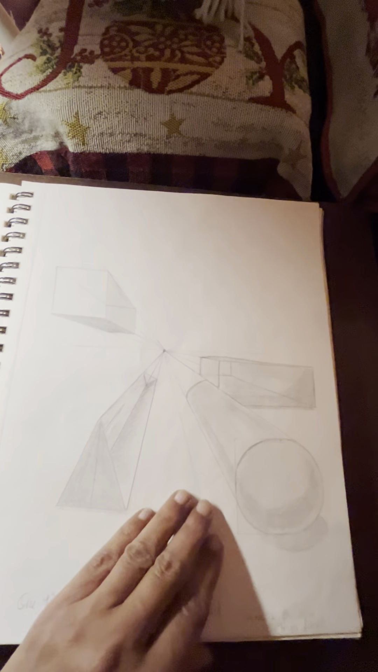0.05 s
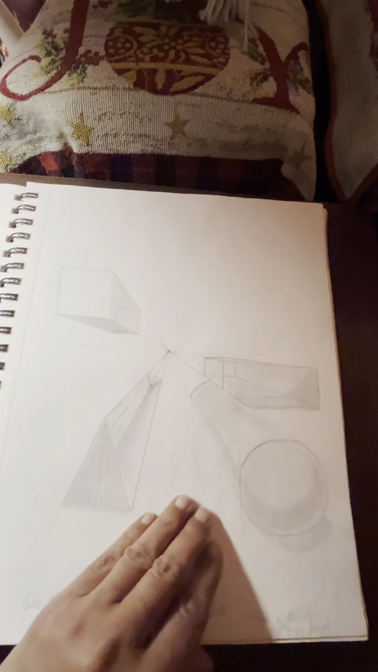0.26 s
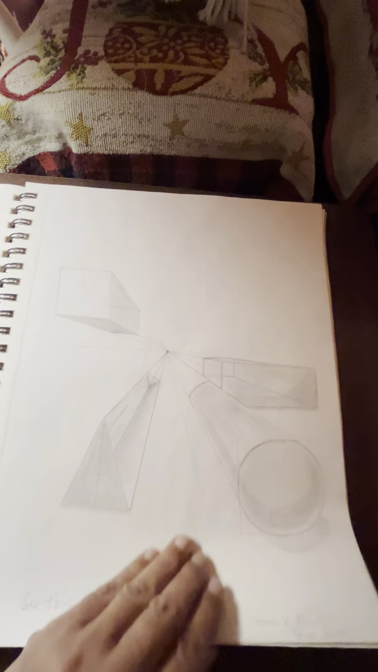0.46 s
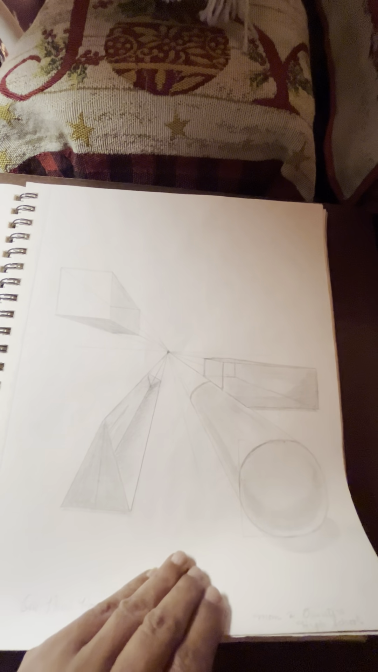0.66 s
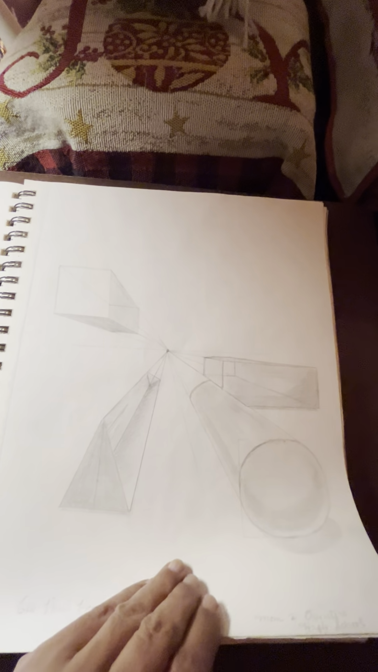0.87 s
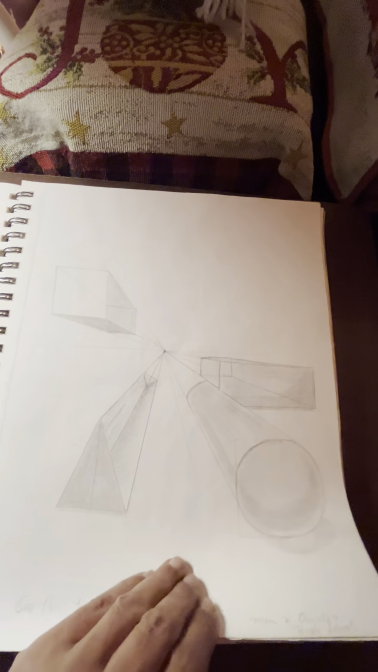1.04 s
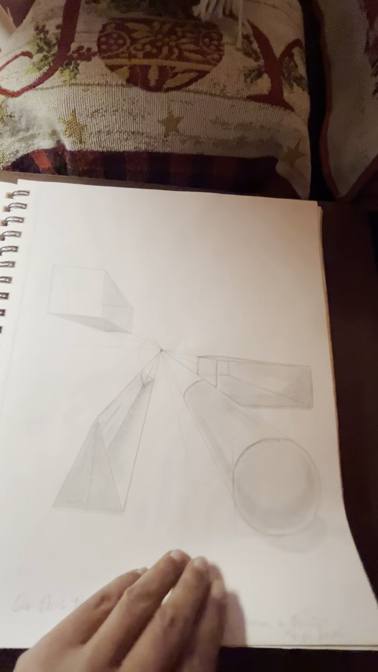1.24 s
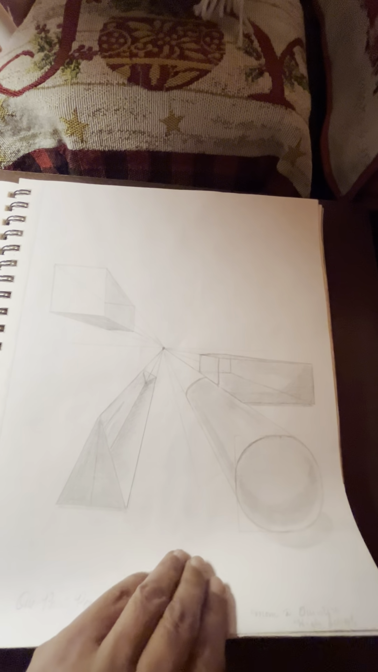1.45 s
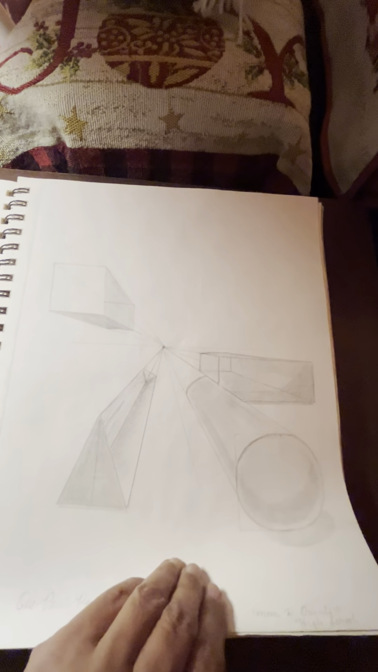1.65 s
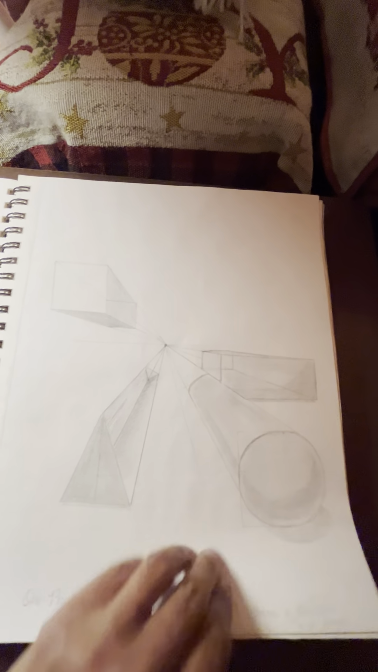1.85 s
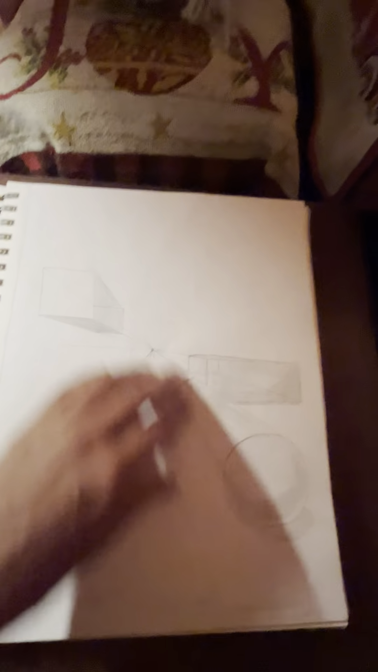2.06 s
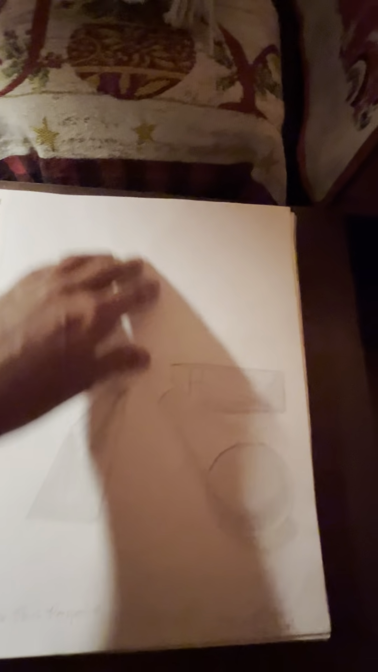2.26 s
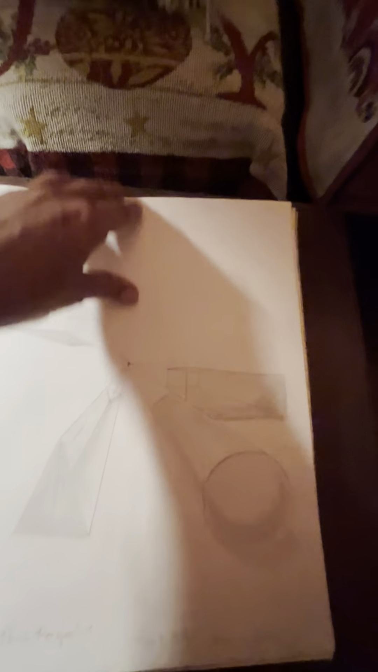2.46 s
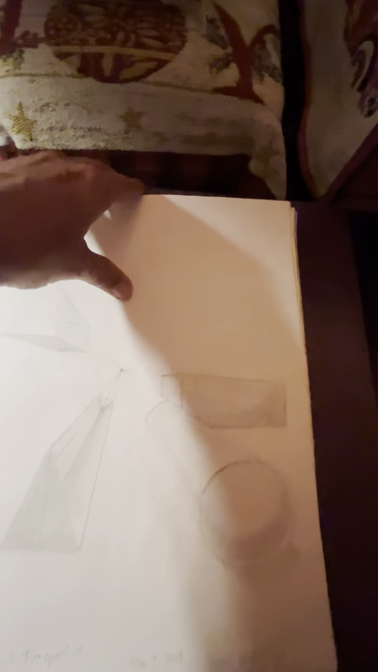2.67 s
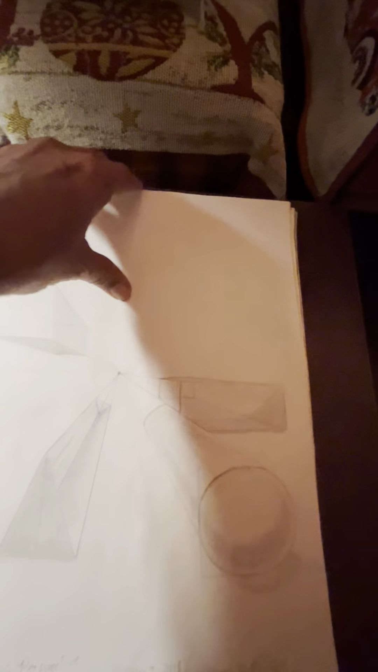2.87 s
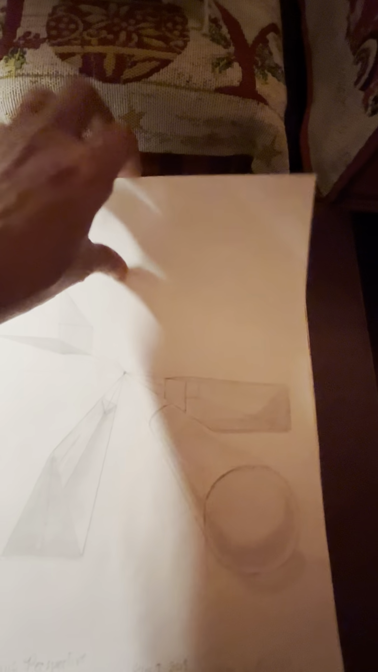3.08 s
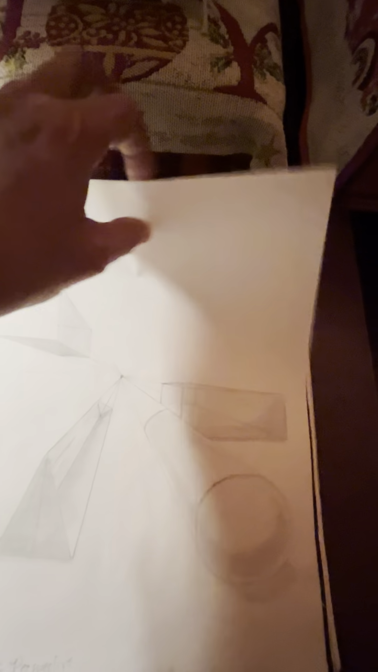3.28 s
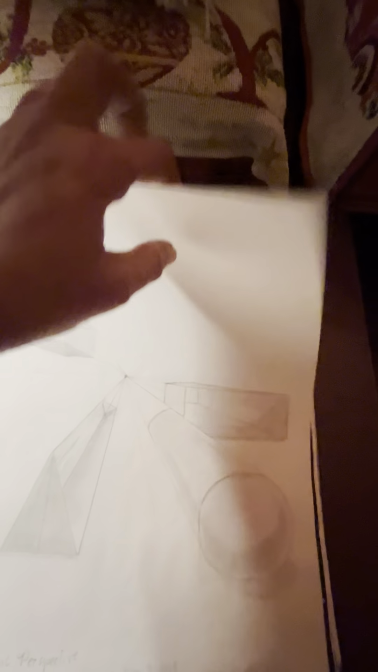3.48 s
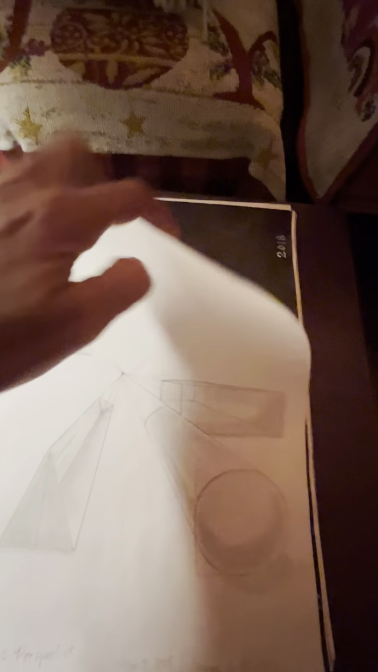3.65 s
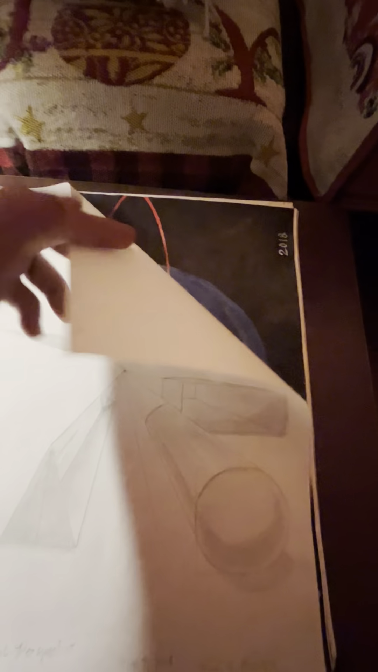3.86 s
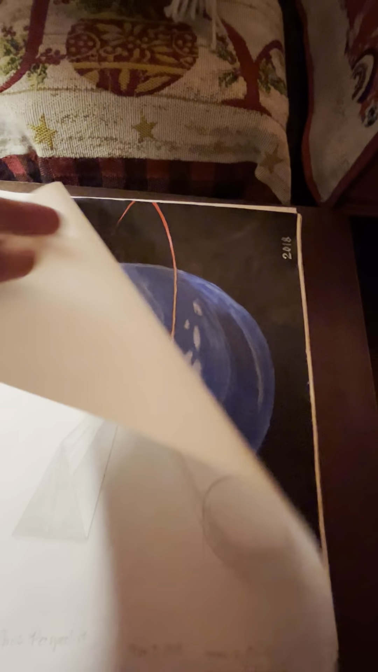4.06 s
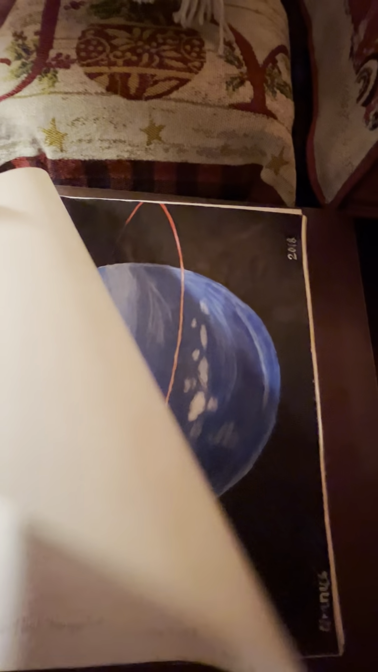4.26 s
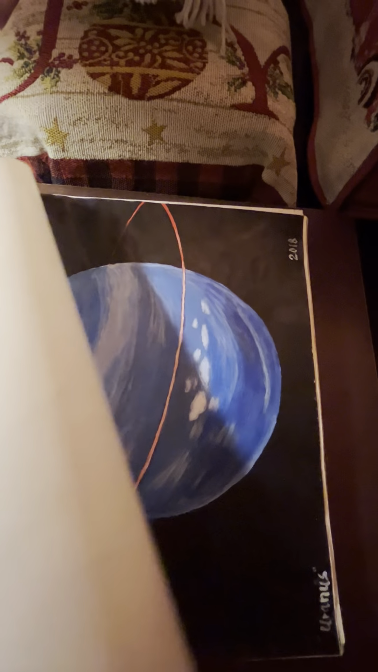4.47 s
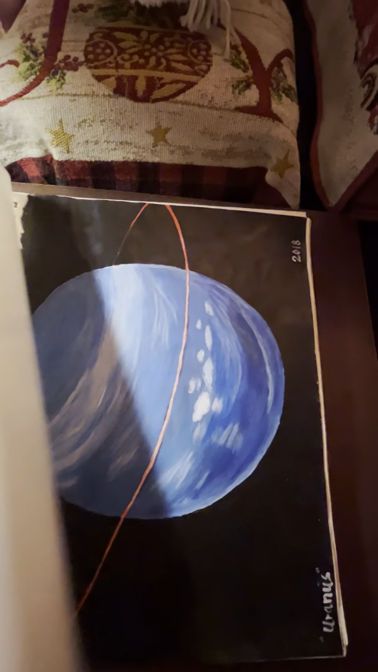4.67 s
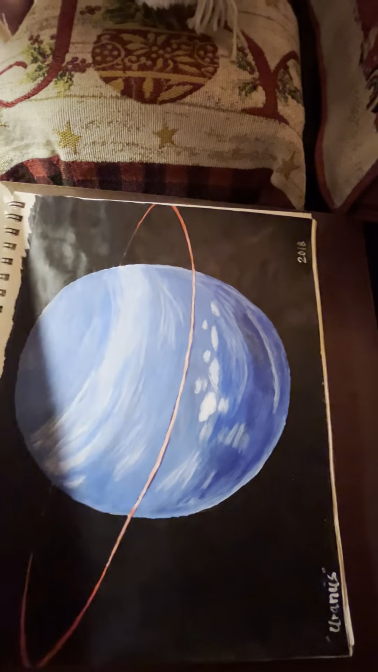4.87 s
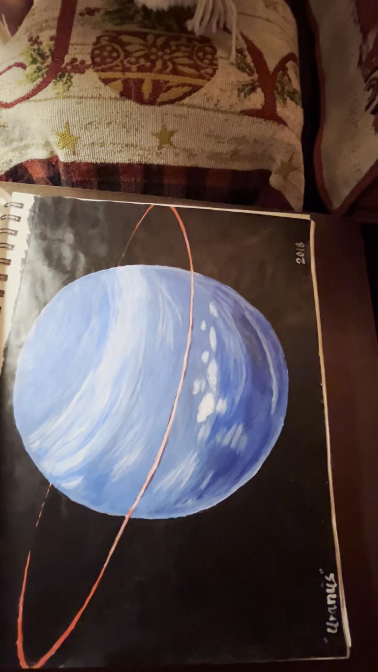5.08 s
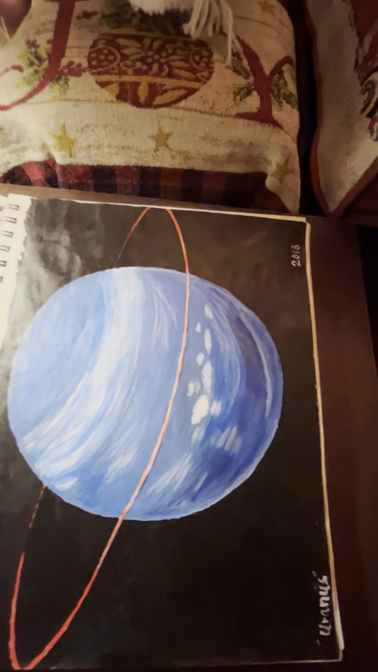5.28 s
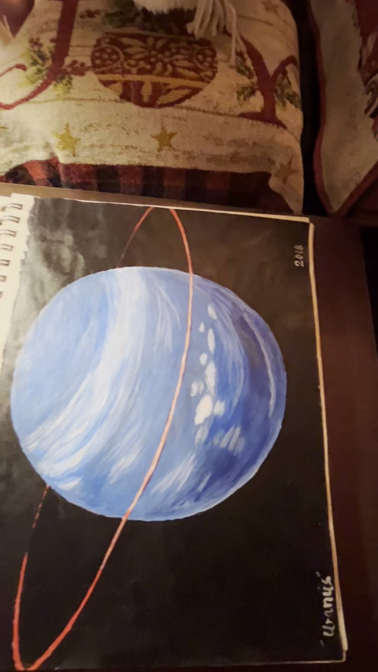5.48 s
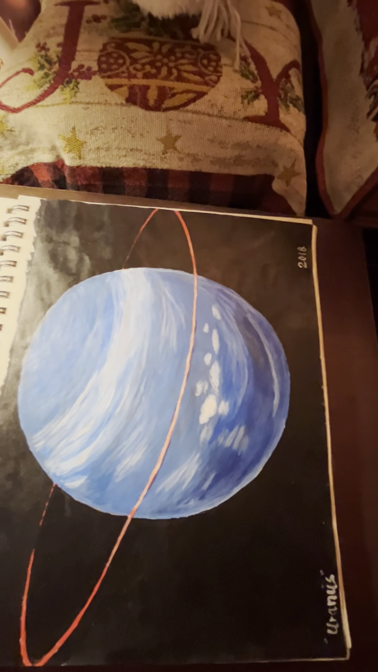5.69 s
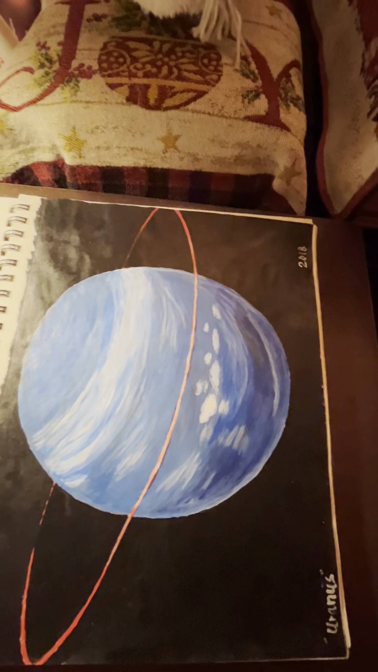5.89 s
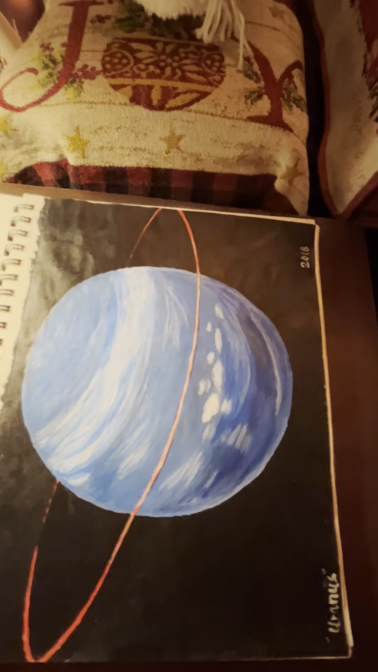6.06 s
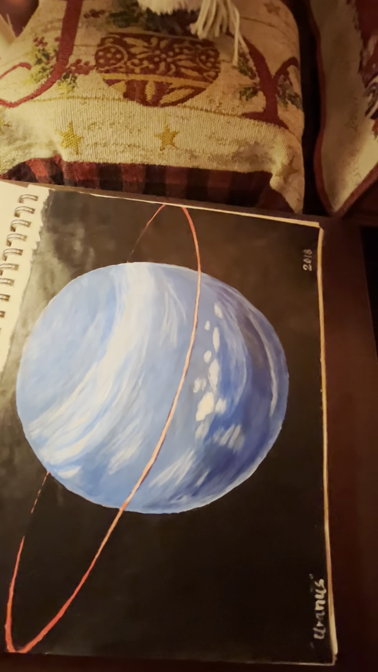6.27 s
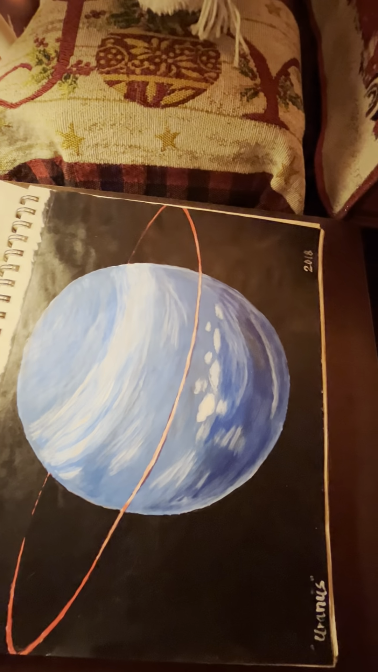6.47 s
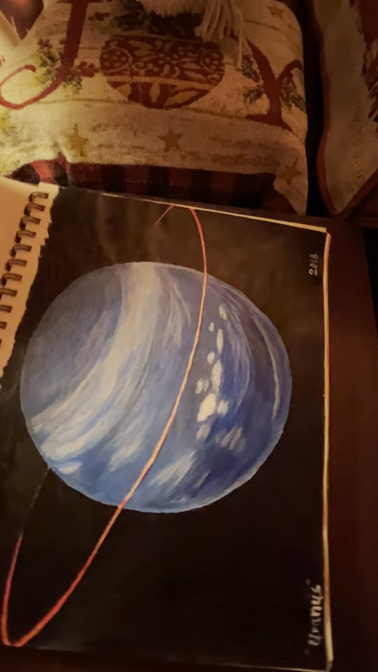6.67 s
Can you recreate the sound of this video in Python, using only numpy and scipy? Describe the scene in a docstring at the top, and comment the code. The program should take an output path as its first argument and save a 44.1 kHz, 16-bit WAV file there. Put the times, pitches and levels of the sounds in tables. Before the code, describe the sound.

Close stereo pickup of a large sketchbook page being turned indoors. Nearly silent at first, with light skin rubs over low room air; a longer dry hiss leads to hard papery snaps with low flaps. A rustling swish follows, then quick clicks, scrapes and hollow pops as the punched edge rides over the wire. It settles to faint rustles and ends in a cluster of dull knocks and a brief metallic ping.

```python
"""Turning a sketchbook page

A hand slides up a page of a spiral sketchbook, lifts its corner and turns it over, close by in a quiet room.
Skin and paper hiss as shaped noise; the stiff sheet snaps in short bursts with a ring, and flaps as low sines.
Its holes scrape, catch and pop on the wire binding. At the end the hand bumps the book and the wire pings.
Two microphone ports hear it all, with soft echoes and a low rush of air behind."""
import sys
import numpy as np
from scipy import signal
from scipy.fft import rfft, irfft, next_fast_len
from scipy.io import wavfile

SR = 44100
rng = np.random.default_rng(int(sys.argv[2]) if len(sys.argv) > 2 else 0)


def master(y):
    """Save y as 16-bit WAV."""
    cut = np.clip(np.atleast_2d(y).T, -1, 1)
    pcm = np.round(cut * 32767)  # scale
    wavfile.write(sys.argv[1], SR, pcm.astype(np.int16))


N = 296793   # samples
TIME = np.arange(N) / SR   # seconds

# Table levels are those of each source by itself, before the book, the room and the microphone.
# Spectra and tilts only shape a sound. A ring time (t60) is the time to fade by 60 dB.


def from_db(db):
    """Turn decibels into a gain."""
    return 10 ** (np.asarray(db) / 20)


def rms_one(x):
    """Scale a sound to an average strength (rms) of 1."""
    return x / np.sqrt(np.mean(x ** 2) + 1e-20)


def at_hz(points, hz):
    """Read a spectrum on a log-frequency axis."""
    f, value = np.transpose(points)
    return np.interp(np.log(hz + 1), np.log(f), value)


def bins(size):
    """The frequencies (Hz) of a spectrum of this many samples."""
    return np.fft.rfftfreq(size, 1 / SR)


def add(track, sound, s):
    """Mix a sound into a track from time s on."""
    start = round(s * SR)
    track[..., start:start + sound.shape[-1]] += sound[..., :N - start]


def drift(rate):
    """Wander at random with a spread of 1, through this many new values a second."""
    knots = rng.standard_normal(4096)
    # straight lines between knots lower the spread; the factor restores it
    return np.interp(TIME * rate % 4095, np.arange(4096), knots) * np.sqrt(3 / 2)


def gain_curve(rows):
    """Turn a level curve into a gain, silent outside its span."""
    s, db = np.transpose(rows)
    return from_db(np.interp(TIME, s, db, left=-150, right=-150))


def movements(rows, attack_s, release_share):
    """Each movement gets up to speed, presses steadily harder or lighter, and slows to rest over its last part."""
    out = np.zeros(N)
    for start, length, level_db, swell_db in rows:
        done = np.clip((TIME - start) / length, 0, 1)
        starting = (TIME - start) / attack_s
        stopping = (1 - done) / release_share
        speed = np.clip(np.minimum(starting, stopping), 0, 1)
        out += from_db(level_db + swell_db * done) * np.sin(np.pi / 2 * speed) ** 2
    return out


def swells(rows):
    """A small shift speeds up and slows down in one smooth arch."""
    out = np.zeros(N)
    for start, length, level_db in rows:
        done = np.clip((TIME - start) / length, 0, 1)
        out += from_db(level_db) * np.sin(np.pi * done) ** 2
    return out


# how alike left and right are: [freq_hz, likeness_0_to_1]
LIKENESS = [(100, 0.98), (400, 0.93), (800, 0.33), (3000, 0.33), (5500, 0.8), (10000, 1)]


def spread(three, hz):
    """One shared and two separate spectra make a stereo pair, alike in the bass and treble."""
    alike = np.clip(at_hz(LIKENESS, hz), 0, 1)
    return np.sqrt(alike) * three[0] + np.sqrt(1 - alike) * three[1:]


def coloured(three, spectrum):
    """Three noises become a stereo sound with this spectrum and an rms of 1."""
    size = next_fast_len(N, real=True)
    hz = bins(size)
    pair = spread(rfft(three, size), hz)
    shaped = pair * from_db(at_hz(spectrum, hz))
    return rms_one(irfft(shaped, size)[:, :N])


def uneven(grain_db, grain_rate, flutter_db, flutter_rate):
    """The slips of rubbing fibres vary in size while the pressure flutters."""
    grain = grain_db * np.clip(drift(grain_rate), -3, 3)
    return from_db(grain + flutter_db * drift(flutter_rate))


def friction(spectrum, grain_db, flutter_db, flutter_rate):
    """Fibres slip in countless tiny jerks, heard as noise of uneven strength."""
    sizes = uneven(grain_db, 1800, flutter_db, flutter_rate)
    return coloured(rng.standard_normal((3, N)) * sizes, spectrum)


def blows(rows, spectrum, crack, crack_s, bend_s, damping, size=8192):
    """Each blow [start_s, level_db, tilt_db_per_octave, t60_s] is a crack and a ring whose treble dies first."""
    out, hz, t = np.zeros((2, N)), bins(size), np.arange(size) / SR
    octave = np.log2(np.clip(hz, 125, 16000) / 1000)   # counted from 1 kHz
    centres = np.arange(-3, 5)
    bands = np.maximum(1 - np.abs(octave - centres[:, None]), 0)
    # bending waves are dispersive: low frequencies arrive later; bend_s is the delay at 1 kHz
    travel = np.exp(-4j * np.pi * bend_s * np.sqrt(1000 * hz))
    # the crack is one push in the bass and a short burst of slipping fibres in the treble
    push = 1 / (1 + (hz * crack_s) ** 2)
    for s, level_db, tilt_db, t60 in rows:
        # the tilt starts at 500 Hz
        colour = from_db(at_hz(spectrum, hz) + tilt_db * np.maximum(octave, -1))
        burst = rng.standard_normal(size) * t * np.exp(-t / crack_s)
        onset = push + (1 - push) * rfft(burst / np.linalg.norm(burst))
        noise = spread(rfft(rng.standard_normal((3, size))), hz)
        modes = irfft(bands[:, None] * noise)
        # t60 holds at 1 kHz and shrinks with each octave upwards
        band_t60 = max(t60, .005) * 2 ** (-damping * centres[:, None, None])
        ring = rfft((modes * from_db(-60 * t / band_t60)).sum(axis=0)) / np.sqrt(SR * .003)
        blow = irfft((ring + crack * onset) * colour * travel)
        blow = blow[:, :size * 3 // 4]
        attack = np.sqrt(np.mean(blow[:, :SR // 200] ** 2))   # rms of the first 5 ms sets the level
        add(out, from_db(level_db) * blow / attack, s)
    return out


# harder blows ring longer: the level with the plain ring time, and the rise that doubles it
MIDDLING_DB, RING_DOUBLES_DB = -47.5, 46


def with_ring(rows, t60):
    """Give each blow its ring time: the harder, the longer."""
    return [(s, db, tilt_db, t60 * 2 ** ((db - MIDDLING_DB) / RING_DOUBLES_DB)) for s, db, tilt_db in rows]


def scattered(span, gain, over_db, spread_db, tilt_db, t60, count):
    """Light blows come at random moments, each about as strong as the friction it comes out of."""
    when, strength = rng.random((count, 2)).T
    times = span[0] + (span[1] - span[0]) * (np.arange(count) + when) / count
    friction_db = 20 * np.log10(np.interp(times, TIME, gain) + 1e-9)
    levels = friction_db + over_db + spread_db * (2 * strength - 1)
    return [(s, db, tilt_db, t60) for s, db in zip(times, levels)]


# the two microphone ports: [freq_hz, left_lead_radians]
PORT_PHASE = [(0, 0), (1000, -.5), (1700, 0), (2700, 2.7), (4400, 2.6), (5300, 3.2), (10000, 9.4),
              (12500, 12.6), (15000, 15.7), (16000, 16)]


def ports(x, side):
    """The spaced ports hear a source with different level and phase."""
    size = next_fast_len(N + 2048, real=True)
    hz = bins(size)
    halves = np.array([[.5], [-.5]])   # left gets half the difference, right the opposite half
    gains = from_db(at_hz(side, hz) * halves)
    gains = gains / np.sqrt(np.mean(gains ** 2, axis=0))
    phase = np.interp(hz, *np.transpose(PORT_PHASE)) * halves
    return irfft(rfft(x, size) * gains * np.exp(1j * phase), size)[:, :N]


# colour of the air in the room: [freq_hz, level_db]
ROOM_SPECTRUM = [(40, -0.5), (70, 7), (150, -0.5), (250, 0), (400, 2), (600, -10), (900, -10), (1400, -17),
                 (2200, -21), (3300, -30.5), (5500, -33.5), (9000, -40.5), (15000, -45.5)]
# faint hum: [pitch_hz, rms_level_db]
HUM = [(242, -68.5), (361, -84), (780, -78)]


def room_tone():
    """A low steady rush of air, arriving from all sides, with a faint hum of slightly wavering pitch."""
    hum = np.zeros(N)
    for hz, db in HUM:
        hum += from_db(db) * np.sqrt(2) * np.sin(2 * np.pi * hz * TIME + 1.65 * drift(6))
    air = rng.standard_normal((3, N))
    air[0] *= from_db(-7.5)   # a diffuse sound is less alike at the two ports
    return from_db(-58.5) * coloured(air, ROOM_SPECTRUM) + hum


def echoes(x, t60, wall_hz):
    """A small, softly furnished room answers with a short dull tail of fading noise."""
    t = np.arange(SR // 2) / SR
    late = t > .006   # the first echo needs 6 ms
    tail = rng.standard_normal((2, len(t))) * from_db(-60 * t / t60) * late
    tail = signal.sosfilt(signal.butter(1, wall_hz, fs=SR, output="sos"), tail)
    tail = tail / np.sqrt(np.sum(tail ** 2) / 2)
    return signal.fftconvolve(x, tail, axes=-1)[:, :N]


# the book's own resonances: [pitch_hz, width_hz, level_added_db]
RESONANCES = [(380, 27, -17.5), (1012, 77, -4.5), (1914, 41, -1.5), (2343, 17, -0.5), (2620, 122, -5.5),
              (3530, 440, -7.5), (4230, 630, -2), (4760, 290, 1.5)]


def resonate(x):
    """The pad of pages and its cover ring along with whatever moves the sheet."""
    out = x
    for hz, width_hz, db in RESONANCES:
        b, a = signal.iirpeak(hz, hz / width_hz, fs=SR)
        out = out + from_db(db) * signal.lfilter(b, a, x + 1e-18)
    return out


# the whole sheet flaps and pushes air: [start_s, level_db, pitch_hz]
FLAPS = [(3.176, -35.5, 58), (3.288, -35, 103), (3.313, -29, 79), (3.369, -31, 65), (3.49, -44, 94),
         (3.552, -40, 59.6), (4.623, -41.5, 77), (5.18, -35, 92), (5.866, -43, 105), (6.099, -44.5, 91),
         (6.335, -43, 100), (6.47, -39.5, 62.4), (6.522, -38.5, 67), (6.634, -29.5, 58.7)]
FLAP_SWINGS = 7.5   # cycles until a flap has died away by 60 dB


def flaps(rise_s, overtone_db):
    """The sheet swings a few times in its lowest bending mode, with a shorter overtone."""
    out, t = np.zeros(N), np.arange(SR // 3) / SR
    for s, level_db, hz in FLAPS:
        fade = from_db(-60 * t * hz / FLAP_SWINGS)
        overtone = np.sin(2 * np.pi * hz * rng.uniform(1.66, 4.45) * t) * np.sqrt(fade)
        swing = np.sin(2 * np.pi * hz * t) + from_db(overtone_db) * overtone
        add(out, from_db(level_db) * swing * fade * (1 - np.exp(-t / rise_s)), s)
    return out


# the hand bumps the book: [start_s, level_db, tilt_db_per_octave, ring_t60_s]
KNOCKS = [(6.088, -46, -16, 0.078), (6.331, -49, -0.5, 0.033), (6.463, -49.5, -2, 0.027),
          (6.515, -51, 3.5, 0.28), (6.562, -25, 3.5, 0.058), (6.573, -28, 5.5, 0.089),
          (6.591, -30, -3.5, 0.077), (6.6265, -24, -5.5, 0.019)]
# colour of the bumped book: [freq_hz, level_db]
BOOK_SPECTRUM = [(60, 3.5), (200, 0.5), (340, 6.5), (550, -7), (800, -5.5), (1100, -0.5), (1500, -16),
                 (2050, -19), (3400, -33), (5000, -44), (8000, -41), (14000, -59)]


def knocks():
    """A bump sets the whole book thudding, with a crack and a short ring."""
    return blows(KNOCKS, BOOK_SPECTRUM, crack=0.85, crack_s=0.00017, bend_s=0.00152, damping=0.22)


def plucks(rows, hz, rise_s, scatter_octaves):
    """A plucked part swells for a few cycles and dies quickly; its pitch may scatter."""
    out, t = np.zeros(N), np.arange(SR // 20) / SR
    for (s, peak_db), chance in zip(rows, rng.uniform(-1, 1, len(rows))):
        ring = np.sin(2 * np.pi * hz * 2 ** (scatter_octaves * chance) * t)
        swell = t / rise_s * np.exp(1 - t / rise_s)
        add(out, from_db(peak_db) * ring * swell, s)
    return out


# the last bump sets the wire ringing: [start_s, peak_db]
PINGS = [(6.628, -36)]


def pings():
    """The wire rings briefly at its own high pitch."""
    return plucks(PINGS, hz=3080, rise_s=0.0028, scatter_octaves=0)


# tabs between the holes slip off the wire: [start_s, peak_db]
POPS = [(4.938, -37.5), (4.9485, -30), (5.091, -31.5), (5.103, -26), (5.1335, -28.5), (5.1465, -32),
        (5.1495, -23.5), (5.161, -25.5), (5.169, -31), (5.1865, -33), (5.208, -30)]


def pops():
    """Each tab springs free with a hollow pop, at a slightly different pitch each time."""
    return plucks(POPS, hz=1058, rise_s=0.0014, scatter_octaves=0.08)


# the sheet falls over, its punched edge dragging round the wire: [time_s, level_db before DRAG_GAIN_DB]
DRAG = [(4.76, -64.5), (4.868, -56.5), (4.925, -37), (5.045, -56), (5.092, -47.5), (5.115, -41.5),
        (5.165, -42.5), (5.195, -48), (5.212, -49), (5.34, -70.5)]
DRAG_GAIN_DB = 1.5
# the punched edge shifts briefly on the wire: [start_s, length_s, level_db]
TUGS = [(3.757, 0.038, -44.5), (4.619, 0.028, -30.5), (4.685, 0.05, -48)]


def dragging():
    """How strongly the punched edge rubs on the wire at each moment."""
    return from_db(DRAG_GAIN_DB) * gain_curve(DRAG) + swells(TUGS)


# the holes catch hard on the wire and let go: [start_s, level_db, tilt_db_per_octave]
CATCHES = [(4.595, -36, 0), (4.6131, -30, 8), (4.6295, -29.5, 1), (4.703, -41.5, 4), (4.924, -40.5, 3),
           (4.988, -37.5, 11), (5.0614, -36.5, 6.5), (5.0825, -35, 7), (5.09, -33, 7.5), (5.097, -33.5, 5),
           (5.1214, -33, 4.5), (5.129, -32, 7), (5.138, -29.5, 3), (5.1445, -34, 1), (5.198, -33.5, -0.5)]
CATCH_RING_S = 0.074   # t60 of a catch of middling strength
# colour of the sheet on the wire: [freq_hz, level_db]
BINDING_SPECTRUM = [(100, -5), (400, -9.5), (750, 5), (1080, 1), (1400, 3), (2000, -6), (2900, -8),
                    (3700, -16), (4700, -18.5), (7500, -19), (10500, -29.5), (15000, -40)]


def binding():
    """The punched edge scrapes along the wire, and its holes catch on it hard or lightly."""
    drag = dragging()
    scrape = drag * friction(BINDING_SPECTRUM, grain_db=2.5, flutter_db=2.5, flutter_rate=69)
    # lighter catches come at random while the edge drags
    ticks = scattered((DRAG[0][0], DRAG[-1][0]), drag, over_db=-5.5, spread_db=7,
                      tilt_db=3.5, t60=0.026, count=24)
    catches = blows(with_ring(CATCHES, CATCH_RING_S) + ticks, BINDING_SPECTRUM,
                    crack=0.52, crack_s=0.00015, bend_s=0.000645, damping=0.53)
    return scrape + catches


def spine():
    """The sounds of the binding side: edge on wire, pops, bumps of the book and the ping."""
    return binding() + pops() + knocks() + pings()


# skin slides over the page: [start_s, length_s, level_db, swell_over_stroke_db]
STROKES = [(0.325, 0.24, -58.5, -5), (1.15, 0.065, -63, 3), (1.88, 0.76, -48, 5), (1.99, 0.15, -58.5, 9),
           (3.01, 0.14, -57, 17), (3.165, 0.3, -40, -1), (3.385, 0.18, -58, 3), (4.87, 0.38, -49.5, -2),
           (6.255, 0.12, -52, -7), (6.37, 0.094, -58, -2)]
# colour of skin on paper: [freq_hz, level_db]
SKIN_SPECTRUM = [(300, -7.5), (1000, -10.5), (2000, -10), (3500, -7), (5000, -9.5), (7000, -1.5),
                 (10000, -2.5), (14000, 0), (15500, 5)]


def skin():
    """Sliding skin rubs on the paper with a hiss."""
    strokes = movements(STROKES, attack_s=0.034, release_share=0.46)
    return strokes * friction(SKIN_SPECTRUM, grain_db=1.6, flutter_db=0.5, flutter_rate=39)


# fingertips shift on the sheet: [start_s, length_s, level_db]
FINGERS = [(0.54, 0.15, -59.5), (0.675, 0.1, -60), (0.745, 0.12, -66.5), (0.83, 0.067, -62.5),
           (1.27, 0.065, -54), (1.3, 0.11, -53.5), (1.365, 0.1, -53), (1.43, 0.12, -54.5),
           (1.56, 0.095, -54), (1.79, 0.078, -57.5), (3.66, 0.26, -56), (3.96, 0.096, -56.5),
           (4.08, 0.081, -55), (5.99, 0.093, -59), (6.26, 0.25, -69)]
# colour of the fingertips: [freq_hz, level_db]
FINGERTIP_SPECTRUM = [(200, 14.5), (700, 8), (1200, 10), (1700, 14.5), (2500, 7), (3300, 4.5), (4600, 0),
                      (6500, -3.5), (8000, -1), (10500, -13), (15500, -17)]


def fingertips(shifting):
    """Small shifts of the fingertips rub the sheet with a fluttering pressure."""
    return shifting * friction(FINGERTIP_SPECTRUM, grain_db=0.5, flutter_db=3.5, flutter_rate=78)


# paper rubs on paper: [start_s, length_s, level_db, swell_over_rub_db]
RUBS = [(0.36, 0.29, -67.5, 1.5), (1.825, 0.068, -54.5, 11), (2.9, 0.096, -64, -18), (3.015, 0.15, -58, 15),
        (3.168, 0.23, -50.5, 12), (3.37, 0.22, -46.5, -6.5), (3.6, 0.076, -64, -8), (3.58, 0.56, -69, 1),
        (3.69, 0.14, -61.5, -17), (4.085, 0.34, -45, -10), (4.383, 0.034, -47, 1), (4.42, 0.39, -58.5, -9),
        (4.45, 0.081, -48.5, -19.5), (4.55, 0.11, -56, -4), (4.68, 0.032, -49, -5),
        (5.545, 0.044, -58, -10), (5.615, 0.074, -60, -6), (5.735, 0.11, -62, -4.5),
        (5.835, 0.053, -57.5, -6), (5.89, 0.033, -52.5, -13), (5.56, 1, -68.5, 2.5), (6.44, 0.3, -64.5, -2),
        (6.37, 0.062, -52, -6.5), (6.555, 0.099, -56.5, 8), (6.68, 0.07, -58, 15)]
# the face of the falling sheet slides over the other pages: [time_s, level_db before SLIDE_GAIN_DB]
SLIDE = [(4.76, -102), (4.9, -59), (5.015, -56.5), (5.05, -59.5), (5.108, -71), (5.34, -93)]
SLIDE_GAIN_DB = 10


def paper_rubbing():
    """How strongly paper rubs on paper at each moment."""
    rubs = movements(RUBS, attack_s=0.022, release_share=0.24)
    return rubs + from_db(SLIDE_GAIN_DB) * gain_curve(SLIDE)


def gliding(x, hz, q, size=128):
    """A resonance, applied twice, whose centre follows hz; rms 1."""
    out, state = np.zeros_like(x), np.zeros((2, 2))
    for i in range(0, len(x), size):
        section = np.concatenate(signal.iirpeak(min(hz[i], SR / 3), max(q, 1), fs=SR))
        out[i:i + size], state = signal.sosfilt([section, section], x[i:i + size], zi=state)
    return rms_one(out)


# the curl of the moving sheet rings, one list for each swish: [time_s, level_db, pitch_hz]
SWISHES = [
    [(4.088, -52.5, 1060), (4.125, -40, 1150), (4.16, -53, 1130), (4.2, -48, 1160), (4.3, -58, 1270),
     (4.375, -48, 1320), (4.42, -70, 1500)],
    [(4.83, -65.5, 1450), (4.925, -44, 1670), (5.04, -47.5, 1700), (5.11, -45, 1190), (5.14, -31, 1070),
     (5.18, -54, 1080)],
]
# resonances of the curl: [multiple_of_lowest_pitch, sharpness_q, level_db]
CURL = [(1, 6, -10.5), (1.55, 3, -13.5), (2.8, 2.5, -3.5), (3.7, 2, -1.5)]


def swishes(grain_db, flutter_db, flutter_rate):
    """Grainy friction rings in the curl of the sheet, whose pitch moves as it bends."""
    out = np.zeros(N)
    slips = rng.standard_normal(N) * uneven(grain_db, 900, flutter_db, flutter_rate)
    for rows in SWISHES:
        s, db, hz = np.transpose(rows)
        span = (TIME > s[0]) & (TIME < s[-1])
        pitch = np.interp(TIME[span], s, hz)
        ring = 0
        for multiple, q, mode_db in CURL:
            ring = ring + from_db(mode_db) * gliding(slips[span], multiple * pitch, q)
        out[span] += from_db(np.interp(TIME[span], s, db)) * ring
    return out


# the moving sheet throws its own rustle back: middle delay, its wander, changes a second, strength
BOUNCE_S, BOUNCE_WANDER_OCTAVES, BOUNCE_RATE, BOUNCE_DB = 0.0012, 0.36, 16, -7.5


def bounced(x):
    """A reflection over a changing gap sweeps peaks and dips through the friction."""
    late = TIME - BOUNCE_S * 2 ** (BOUNCE_WANDER_OCTAVES * drift(BOUNCE_RATE))
    gain = from_db(BOUNCE_DB)
    reflection = np.array([np.interp(late, TIME, channel) for channel in x])
    return (x + gain * reflection) / np.sqrt(1 + gain ** 2)


# colour of paper on paper: [freq_hz, level_db]
PAPER_SPECTRUM = [(200, -1.5), (700, -4), (1200, -3.5), (1700, -4.5), (2500, -6.5), (3300, -5),
                  (4600, -4.5), (6500, -5), (8000, -5), (10500, -14.5), (13000, -19), (15500, -13)]


def paper(rubbing):
    """Paper rustles on paper and swishes as it curls, with its own reflection added."""
    rustle = rubbing * friction(PAPER_SPECTRUM, grain_db=1.5, flutter_db=1.0, flutter_rate=110)
    return bounced(rustle + swishes(grain_db=0.0, flutter_db=2.5, flutter_rate=100))


# the sheet buckles: [start_s, level_db, tilt_db_per_octave]
SNAPS = [(0.523, -51, -7), (1.873, -46.5, 17), (3.023, -36, -4.5), (3.135, -49.5, -11),
         (3.174, -44.5, -6.5), (3.2824, -23.5, -0.5), (3.286, -24, -6.5), (3.308, -34.5, -5.5),
         (3.364, -36.5, -6.5), (3.477, -40, -5), (3.4851, -20, -4), (3.768, -46.5, 3), (3.9539, -61, 10),
         (4.096, -45, -8), (4.2677, -45.5, 5), (4.344, -49, 6), (4.403, -39.5, -3), (5.1214, -24.5, 0),
         (5.8514, -52.5, 8), (6.6055, -39.5, 2)]
SNAP_RING_S = 0.05   # t60 of a snap of middling strength
BUCKLE_S = .001   # a buckle runs through the sheet in a short tearing burst
# colour of the buckling sheet: [freq_hz, level_db]
SHEET_SPECTRUM = [(80, -7.5), (200, -14), (370, -2.5), (700, -16.5), (1200, 1), (1650, -4.5), (2100, 2.5),
                  (3200, 1), (4500, 3.5), (7000, -0.5), (10500, -11.5), (15000, -19)]
HANDLED_S = (3.0, 6.7)   # from when to when the sheet crinkles


def buckling(handling):
    """The stiff sheet snaps as it buckles; tiny crinkles come at random, as strong as the handling."""
    snaps = blows(with_ring(SNAPS, SNAP_RING_S), SHEET_SPECTRUM,
                  crack=1.0, crack_s=BUCKLE_S, bend_s=0.001164, damping=0.4)
    rows = scattered(HANDLED_S, handling, over_db=-7, spread_db=10.5,
                     tilt_db=-3.5, t60=0.0084, count=150)
    crinkles = blows(rows, SHEET_SPECTRUM, crack=1.6, crack_s=0.0005, bend_s=0.000447, damping=.3, size=2048)
    return snaps + crinkles


def page():
    """Skin, fingertip and paper friction, with the snaps and crinkles of the buckling sheet."""
    shifting = swells(FINGERS)
    rubbing = paper_rubbing()
    return skin() + fingertips(shifting) + paper(rubbing) + buckling(rubbing + shifting)


# where each source is heard: [freq_hz, left_minus_right_db]
ROOM_SIDE = [(500, -0.5), (950, 5), (1500, 1), (5000, -1)]
SPINE_SIDE = [(350, 0), (700, 7), (1100, 9), (2000, 2.5), (2800, 2.5), (3800, -0.5), (6000, -0.5)]
PAGE_SIDE = [(400, 1), (1200, 1), (2300, -3.5), (3300, -3.5), (4600, -2.5), (6500, -0.5)]


def scene():
    """The sheet and its binding sound through the book into a quiet room."""
    room = ports(room_tone(), ROOM_SIDE)
    moved = ports(spine(), SPINE_SIDE) + ports(page(), PAGE_SIDE)
    sheet = from_db(-2.0) * resonate(moved)
    book = sheet + flaps(rise_s=0.0029, overtone_db=-2.5)
    return room + book + from_db(-18.5) * echoes(book, t60=0.12, wall_hz=4430)


CUTOFF_HZ = 15900


def record(dry):
    """The microphone drops the deepest bass; the top is cut."""
    thin = signal.sosfilt(signal.butter(4, 34, "high", fs=SR, output="sos"), dry)
    return signal.sosfilt(signal.ellip(10, .1, 80, CUTOFF_HZ, fs=SR, output="sos"), thin)


dry = scene()
out = record(dry)
master(out)
```